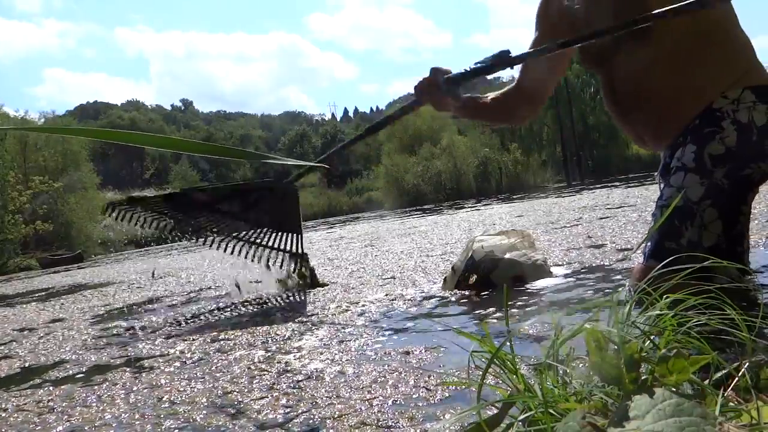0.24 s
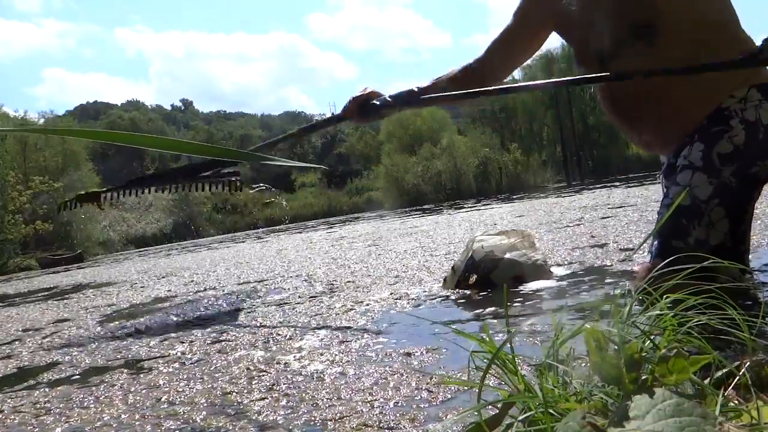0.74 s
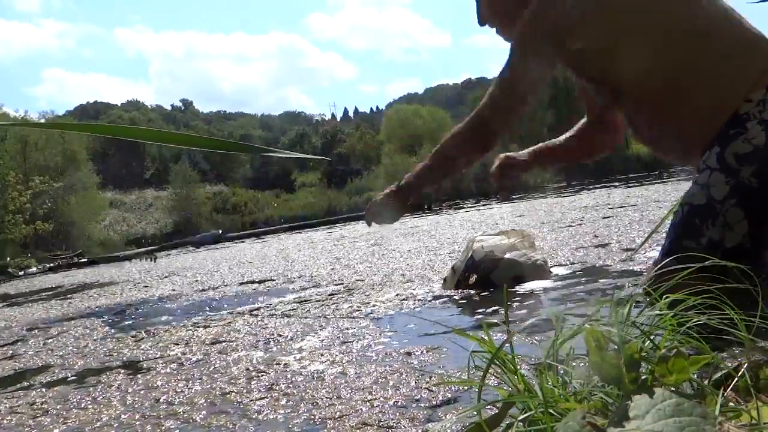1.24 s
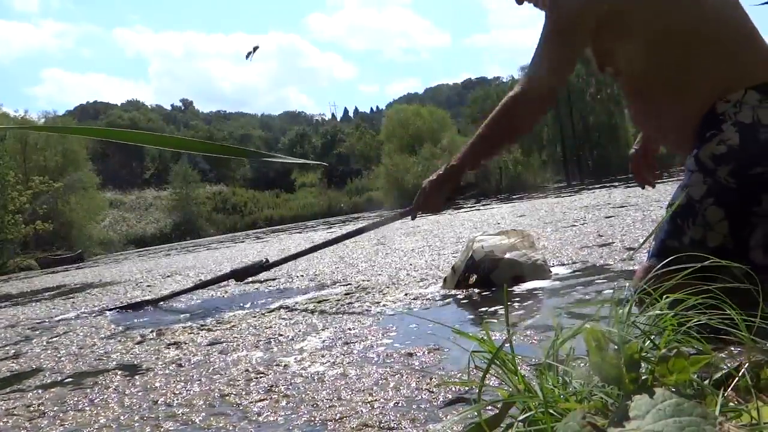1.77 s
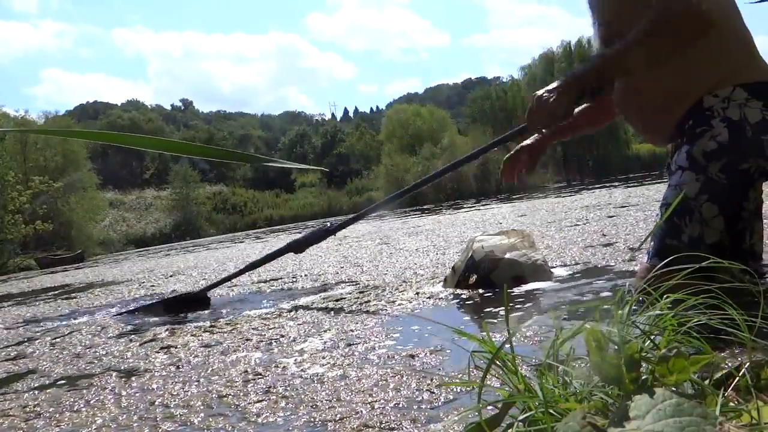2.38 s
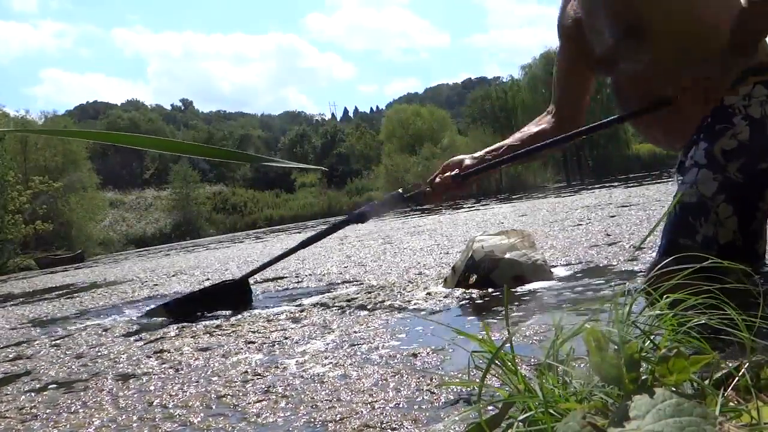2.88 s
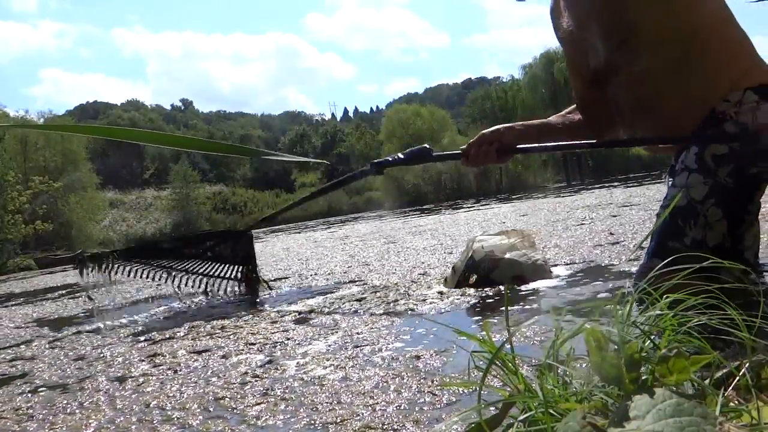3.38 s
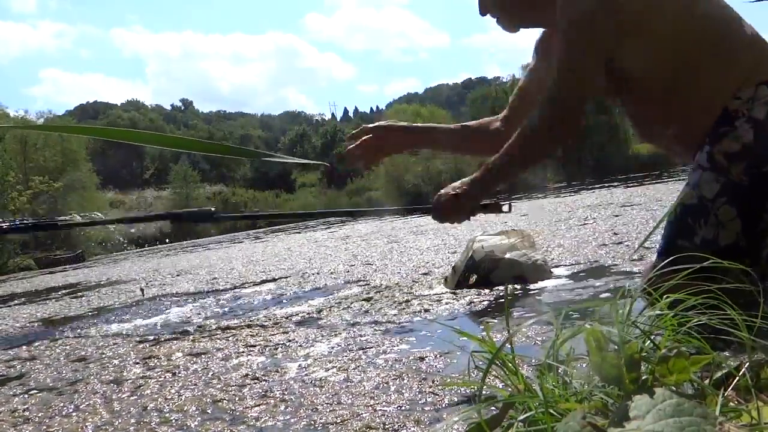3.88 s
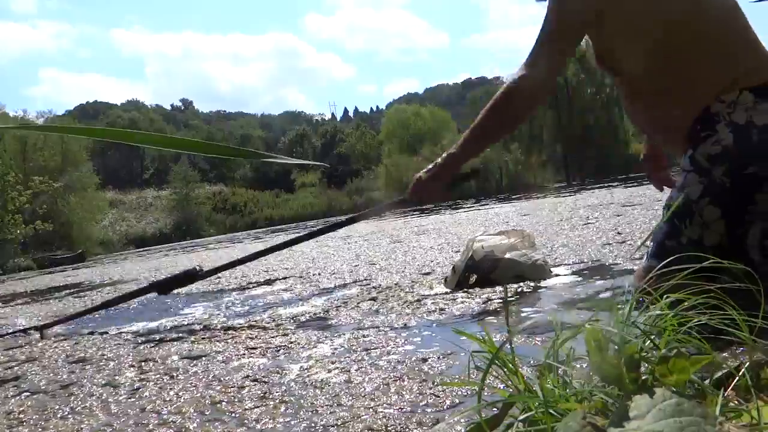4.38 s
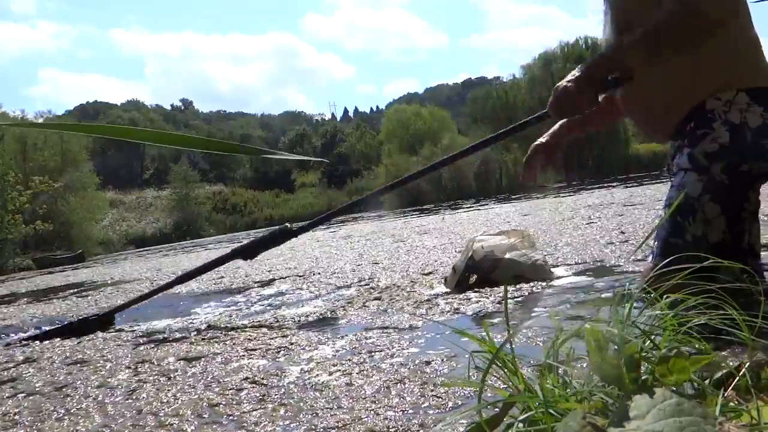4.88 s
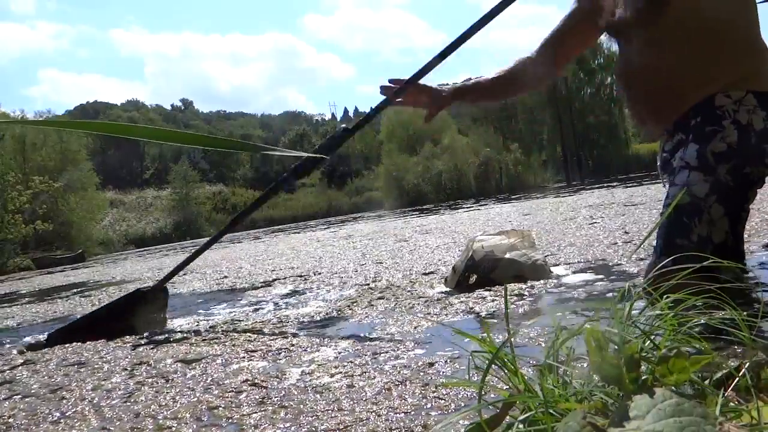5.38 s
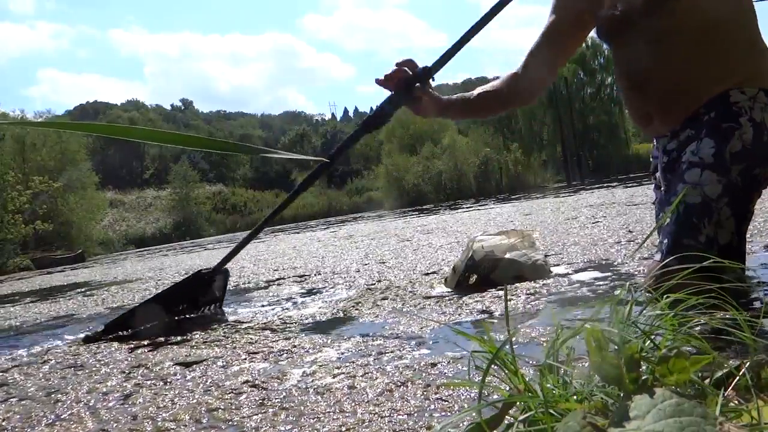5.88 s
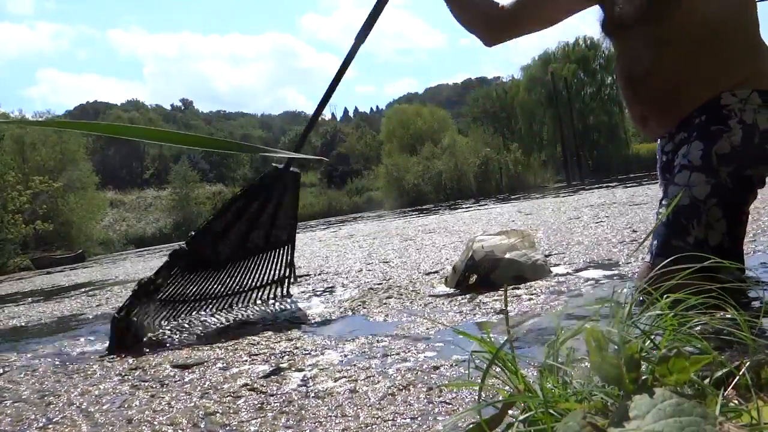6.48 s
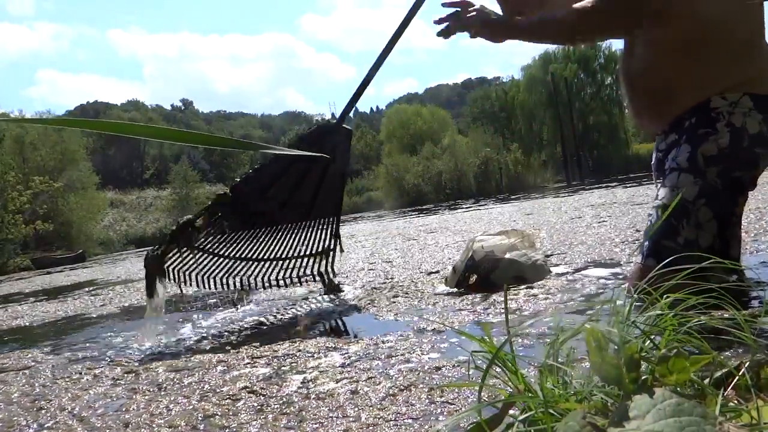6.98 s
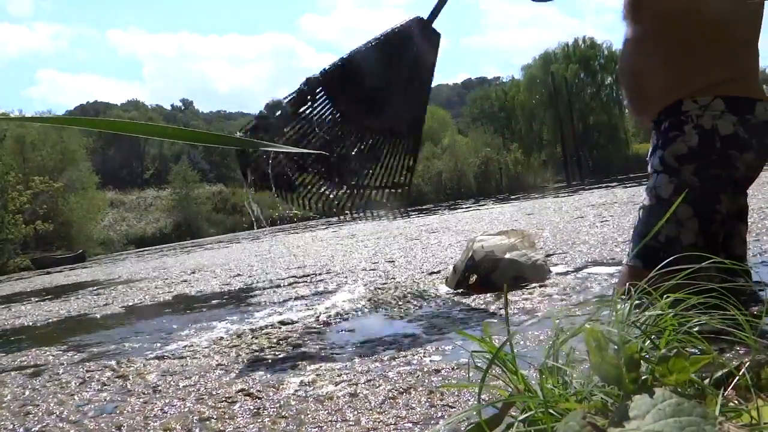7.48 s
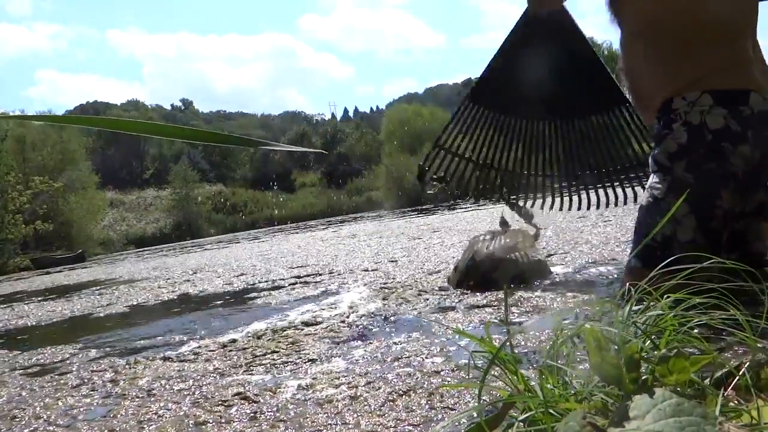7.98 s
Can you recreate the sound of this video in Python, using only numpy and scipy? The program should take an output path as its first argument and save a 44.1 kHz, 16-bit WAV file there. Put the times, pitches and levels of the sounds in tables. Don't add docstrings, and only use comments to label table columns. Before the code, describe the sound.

A shrill cicada chorus, one throbbing close by, fills the outdoor air while a rake drags through a weedy pond with small splashes, drips and trickles.

```python
import sys
import numpy as np
from scipy import signal
from scipy.fft import rfft, irfft, next_fast_len
from scipy.io import wavfile
from scipy.ndimage import uniform_filter1d

SR = 44100
rng = np.random.default_rng(int(sys.argv[2]) if len(sys.argv) > 2 else 0)


def gain_from_db(level_db):
    decades = np.asarray(level_db, float) / 20
    return 10 ** decades


def master(y):
    cut = np.clip(np.atleast_2d(y).T, -1, 1)
    pcm = np.round(cut * 32767)
    wavfile.write(sys.argv[1], SR, pcm.astype(np.int16))


N = 363384


def rms_one(x):
    return x / np.sqrt(np.mean(x ** 2) + 1e-20)


def read(rows, at):
    first, *columns = np.transpose(rows)
    return [np.interp(at, first, c) for c in columns]


def at_hz(points, hz):
    points = np.array(points)
    return np.interp(np.log(hz), np.log(points[:, 0]), points[:, 1])


def drift(rate_hz):
    r = np.exp(-80 * np.pi * rate_hz / SR)
    chance = rng.standard_normal(N // 40 + 2002)
    slow = signal.lfilter([1], [1, -2 * r, r * r], chance)[2000:]
    return np.interp(np.arange(N) / 40, np.arange(len(slow)), rms_one(slow))


def panned(x, left_db):
    return x * gain_from_db(np.array([[left_db / 2], [-left_db / 2]]))


def add(out, x, i):
    x = x[..., :max(N - i, 0)]
    out[..., i:i + x.shape[-1]] += x


def wide_noise(spectrum, patchy_db, count):
    # (frequency [Hz], likeness [0-1])
    likeness = [(60, 0.98), (140, 0.94), (340, 0.86), (810, 0.78), (1930, 0.88), (4590, 0.9), (10900, 0.77)]
    # (frequency [Hz], left minus right [dB])
    leaning = [(60, 2), (140, -0.5), (340, 1), (810, -2), (1930, 2), (4590, 3.5), (10900, 1.5)]
    size = next_fast_len(N)
    hz = np.maximum(np.arange(size // 2 + 1) * SR / size, 1)
    alike = np.clip(at_hz(likeness, hz), 0, 1)
    mid, side = rfft(rng.standard_normal((2, size)))
    pair = np.sqrt(1 + alike) * mid + np.sqrt(1 - alike) * side * [[1], [-1]]
    pair = pair * gain_from_db(at_hz(spectrum, hz) + at_hz(leaning, hz) * [[.5], [-.5]])
    place = np.interp(np.log(hz), np.log([spectrum[0][0], spectrum[-1][0]]), [-1, count])
    out = np.zeros((2, N))
    for k in range(count):
        share = np.clip(1 - np.abs(place - k), 0, 1) ** .5
        out += irfft(pair * share, size)[:, :N] * gain_from_db(patchy_db * drift(13.5))
    return rms_one(out)


def far_chorus(t):
    # (frequency [Hz], density [dB per Hz])
    low_colour = [(1760, -72), (3000, -27), (3310, -22), (3640, -10), (4110, -8), (4440, -6), (4810, -6),
                  (5030, -2.5), (5290, 2), (5430, -6), (5650, -0.5), (6220, -5.5), (7200, -8), (9360, -18),
                  (15800, -120)]
    high_colour = [(5000, -8), (6800, 0.5), (7070, -14), (7560, 8.5), (8570, 1.5), (9300, 0.5),
                   (9700, -0.5), (10500, -4), (11100, 1), (15000, 5)]
    # (time [s], level [dB])
    low_level = [(0, -25), (1.5, -25), (2.5, -24.5), (3, -26), (4.5, -26.5), (5.6, -26.5), (6.4, -26),
                 (6.7, -27.5), (8.24, -27.5)]
    high_level = [(0, -32), (2, -28), (2.5, -38), (3, -32), (4.5, -27), (4.9, -27.5), (5.8, -27.5),
                  (6.4, -31.5), (7.3, -34.5), (7.7, -33), (8.24, -35)]
    low = gain_from_db(read(low_level, t)[0]) * wide_noise(low_colour, patchy_db=0.5, count=5)
    high = gain_from_db(read(high_level, t)[0]) * wide_noise(high_colour, patchy_db=1.43, count=6)
    return low + high


def whining_cicada(t):
    # (time [s], clicks per second [1/s])
    clicks = [(0, 211), (.76, 211.2), (1.23, 211.6), (3.84, 212.5), (4.24, 212.4), (4.57, 211.2),
              (4.73, 209.3), (5.08, 201), (5.5, 191)]
    # (time [s], level [dB])
    effort = [(0, 0), (.8, 2), (1.7, 1), (2.9, .5), (3.5, -1), (4.1, .5), (4.4, 3.5), (4.75, 0), (5.5, 4)]
    # (rms level [dB], time of fullest voice [s], spread [s], time of one top of the bending [s])
    overtones = [(-44.5, 2.02, 1.41, 3.72), (-41.2, 2.35, 1.32, 4.01), (-38.4, 3.64, 1.57, 3.82),
                 (-45.8, 2.89, 1.88, 1.82), (-35.3, 2.78, 1.48, 3.85), (-45.9, 1.86, 2.27, 3.18),
                 (-50.3, 3.79, 3.0, 2.6), (-45.4, 4.02, 1.88, 1.97), (-36.1, 1.87, 1.81, 3.18),
                 (-32.8, 3.12, 0.88, 2.22), (-39.3, 1.93, 1.73, 2.94), (-25.3, 2.97, 0.99, 3.53),
                 (-34.2, 5.4, 3.0, 2.71), (-33.6, 2.72, 1.67, 2.89), (-39.3, 0.02, 3.0, 4.07),
                 (-29.5, 2.47, 1.44, 1.64), (-37.9, 3.18, 1.39, 2.23), (-33.7, 3.01, 1.25, 3.18),
                 (-31.4, 2.97, 1.38, 1.61), (-41.6, 5.5, 3.0, 2.64), (-42.3, 2.29, 2.05, 2.12),
                 (-40.0, 2.72, 1.6, 2.08), (-46.4, 3.3, 3.0, 2.44), (-44.1, 3.45, 1.39, 2.04),
                 (-42.0, 2.93, 1.47, 2.2), (-35.9, 3.14, 0.84, 3.44)]
    first_overtone = 26
    tires_s, end_s = 4.2, clicks[-1][0]
    bend_s, bend_depth = 1.7, .4
    port_phase = .55

    (per_s,), (effort_db,) = read(clicks, t), read(effort, t)
    tired = np.clip((t - tires_s) / (end_s - tires_s), 0, 1)
    unsteady_hz = .045 + .6 * tired ** 2
    turn = 2 * np.pi * np.cumsum(per_s + unsteady_hz * drift(20.0)) / SR
    out, coarse, last = np.zeros((2, N)), t[::64], int(end_s * SR)
    for k, (db, fullest_s, spread_s, top_s) in enumerate(overtones):
        bend = (1 + bend_depth * np.cos(2 * np.pi * (coarse - top_s) / bend_s)) / (1 + bend_depth)
        size = gain_from_db(db) * bend * np.exp(-.5 * ((coarse - fullest_s) / spread_s) ** 2)
        size = np.repeat(size, 64)[:N] * gain_from_db((2.4 + 3 * tired) * drift(6.0))
        start = rng.uniform(0, 2 * np.pi)
        apart = port_phase * rng.choice([-1, 1]) * np.array([[.5], [-.5]])
        out[:, :last] += size[:last] * np.sin((first_overtone + k) * turn[:last] + start + apart)
    ending = np.clip((end_s - t) / 0.29, 0, 1)
    return panned(np.sqrt(2) * gain_from_db(0.24 + effort_db) * ending * out, left_db=1.9)


def drum_pulses(per_s, weak, hz, modes, sharp, ribs):
    count = np.cumsum(per_s) / SR
    every_other = np.floor(count) % 2
    gate = np.abs(np.sin(np.pi * count)) ** (2 * sharp) * (1 - weak * every_other)
    chance = rng.standard_normal((len(modes) + 2, N // 16 + 1)).repeat(16, axis=1)[:, :N]
    uneven, apart, *ragged = signal.lfilter([.1], [1, -.9], chance)
    both = np.zeros(N, complex)
    for (offset_hz, width_hz, db), wander in zip(modes, ragged):
        turn = 2 * np.pi * np.cumsum(hz + offset_hz + width_hz * wander) / SR
        both += gain_from_db(db) * np.exp(1j * turn)
    other = 0.1 * apart * both.imag
    pulses = gate * gain_from_db(ribs * uneven)
    return rms_one(panned(pulses * (both.real + other * [[1], [-1]]), left_db=2.3))


def throbbing_cicada(t):
    # (time [s], level [dB])
    throbs = [(-.17, -31), (.15, -30), (.48, -32), (.78, -30), (1.08, -29), (1.40, -32), (1.70, -28),
              (2.0, -27), (2.31, -25.5), (2.62, -30), (2.94, -32), (3.27, -25.5), (3.58, -25), (3.9, -27.5),
              (4.22, -29.5), (4.55, -27.5), (4.89, -24.5), (5.21, -24), (5.57, -33), (5.85, -28),
              (6.13, -30), (6.41, -29), (6.7, -60), (9, -60)]
    # (share of the throb after the loud end [0-1], pulse rate [1/s], level [dB],
    # weakness of every other pulse [0-1], belly resonance [Hz])
    course = [(0, 161, 2.5, .96, 5560), (.16, 160, 1, .95, 5620), (.3, 160, -4, .9, 5640),
              (.36, 168, -9, .1, 5350), (.6, 178, -6, .05, 5380), (.8, 186, -5, .1, 5460),
              (.88, 162, 0, .92, 5500), (1, 161, 2.5, .96, 5560)]
    # (offset [Hz], width [Hz], level [dB])
    belly_modes = [(-450, 170, -1), (0, 150, 0), (420, 170, -2), (780, 200, -6), (-1000, 300, -11)]
    ends_s, ends_db = np.transpose(throbs)
    place = np.interp(t, ends_s, np.arange(len(throbs)))
    per_s, shape_db, weak, hz = read(course, place - np.floor(place))
    nearest = np.floor(place + .65).astype(int)
    level = uniform_filter1d(gain_from_db(ends_db[nearest] + shape_db + 1), size=300)
    return level * drum_pulses(per_s, weak, hz, belly_modes, sharp=.65, ribs=.5)


def bubble(hz, cycles, rise):
    u = np.arange(int(cycles / hz * SR)) / SR * hz / cycles
    ring = np.sin(2 * np.pi * cycles * (u + rise * u ** 2))
    return ring * np.exp(-5 * u) * (1 - np.exp(-15 * u)) * 2.14


def trickle(per_s, level_db):
    out, chance = np.zeros((2, N)), rng.random((N // 20, 5))
    for j in np.flatnonzero(chance[:, 0] < per_s * 20 / SR):
        hz = 330 * 7 ** (chance[j, 1] ** 1.616)
        size = gain_from_db(-5 * np.log(1 - 0.75 * chance[j, 2])) * (400 / hz) ** 0.06
        ring = bubble(hz, 8 + 12 * chance[j, 3], rise=0.2)
        add(out, panned(size * ring, 5 * (chance[j, 4] - .5)), j * 20)
    return gain_from_db(level_db) * rms_one(out)


def stirred_pond(t):
    # (time [s], level [dB])
    stirring = [(0, -44), (.8, -42), (1.33, -44), (1.58, -42), (2.16, -45.5), (2.84, -43), (4.06, -44.5),
                (4.31, -40.5), (4.8, -42), (5.46, -45), (6.15, -41), (6.68, -43.5), (7.25, -43),
                (7.62, -40.5), (8.24, -43.5)]
    # (frequency [Hz], density [dB per Hz])
    murmur = [(18, -70), (30, -24), (129, -17.5), (332, -2.5), (414, -6.5), (559, 2), (904, -8), (1080, -4),
              (1400, -4), (1580, -8), (2180, -9), (3190, -7), (3600, -7), (4680, -8), (7920, -120)]
    stir_db, = read(stirring, t)
    bubbles = trickle(155, -55 + 0.9 * (stir_db - stir_db.mean()))
    return gain_from_db(stir_db) * wide_noise(murmur, patchy_db=1.48, count=6) + bubbles


def splashes():
    # (time [s], bubble peak [dB], bubble pitch [Hz], spray peak [dB], spray length [s])
    slaps = [(1.379, -31, 540, -22.5, 0.011), (1.396, -19.5, 460, -23.5, 0.0043),
             (4.082, -33, 565, -37.5, .005), (4.097, -48, 600, -26.5, 0.028),
             (4.114, -23, 520, -36, 0.0075), (4.15, -36, 605, -28.5, 0.027),
             (4.167, -18.5, 393, -20.5, 0.0024), (7.634, -23, 1054, -28, 0.0055),
             (7.652, -42, 333, -33, .008), (8.075, -29, 625, -28, .004), (8.106, -36, 546, -32.5, 0.008),
             (8.195, -25, 627, -28.5, .004)]
    # (time [s], peak [dB], bubble pitch [Hz])
    drips = [(.009, -44, 382), (.607, -28, 1020), (.799, -25, 452), (1.029, -45, 1020), (1.658, -38, 325),
             (2.519, -28, 500), (2.859, -30, 563), (2.916, -32, 380), (2.944, -28, 440), (2.976, -18, 484),
             (3.059, -31, 360), (3.134, -24.5, 580), (4.247, -37, 440), (4.53, -21, 643),
             (6.699, -26.5, 589), (6.812, -31, 338), (6.839, -25, 293), (6.885, -32, 295),
             (6.927, -28, 300), (7.042, -24.5, 396), (7.729, -29, 432)]
    # (time [s], peak [dB])
    thumps = [(.009, -51), (1.395, -49), (2.961, -42), (2.976, -34), (3.06, -49), (4.168, -54),
              (6.813, -43), (6.839, -46), (7.635, -56)]
    # (frequency [Hz], density [dB per Hz])
    spray_colour = [(60, -22), (250, -9.5), (600, -1), (1000, -13), (1500, -7.5), (3000, -3.5),
                    (5000, -5.5), (9000, -2), (20000, -17)]
    out, spray = np.zeros((2, N)), wide_noise(spray_colour, patchy_db=-2, count=2)
    droplets = signal.sosfilt(signal.butter(2, 250, fs=SR, output="sos"), rng.standard_normal(N))
    spray = rms_one(spray * gain_from_db(1.7 * rms_one(droplets)))
    for s, db, hz, spray_db, length_s in slaps:
        i, u = round(s * SR), np.arange(6000) / SR / max(length_s, .002)
        swell = u ** 1.63 * np.exp(-u ** 1.43)
        burst = swell[:N - i] * spray[:, i:i + 6000]
        add(out, gain_from_db(spray_db + 11.5) * burst / np.abs(burst).max(), i)
        add(out, gain_from_db(db + 0.5) * bubble(hz, 6.1, rise=0.065), i)
    for s, db, hz in drips:
        add(out, gain_from_db(db - 11.0) * bubble(hz, 17.0 + hz / 150, rise=0.054), round(s * SR))
    for s, db in thumps:
        add(out, gain_from_db(db + 2.5) * bubble(177, 5.6, rise=0.099), round(s * SR))
    return out


def ticks():
    # (time [s], peak [dB], pitch [Hz])
    drops = [
        (0.38, -33, 2020),
        (0.698, -32, 1820),
        (1.179, -25, 2360),
        (2.321, -30, 2230),
        (4.196, -22, 1900),
        (8.099, -28, 2340),
    ]
    out = np.zeros((2, N))
    for s, db, hz in drops:
        for ratio in (.8, 1.02, 1.3):
            tick = gain_from_db(db - 4.5) * bubble(hz * ratio, 24.0, rise=.03)
            add(out, panned(tick, -3.5), round(s * SR))
    return out


def brief_singers(t):
    # (time [s], length [s], first pitch [Hz], last pitch [Hz], level [dB])
    phrases = [
        (3.299, .5, 5050, 5080, -32.5),
        (4.302, 0.43, 5180, 5150, -34),
        (4.944, 0.27, 5830, 6250, -30),
        (5.472, 0.39, 5540, 5900, -29),
        (5.88, .35, 5620, 5720, -33),
        (.45, .4, 4930, 4970, -38),
        (1.4, .35, 4920, 5030, -31),
        (1.8, .75, 5500, 5640, -34),
    ]
    level, hz = np.zeros(N), np.full(N, 5500.)
    for s, length_s, first_hz, last_hz, db in phrases:
        share = (t - s) / length_s
        on = (share > 0) & (share < 1)
        level[on] = gain_from_db(db) * np.sin(np.pi * share[on]) ** 0.29
        hz[on] = first_hz + (last_hz - first_hz) * share[on]
    return level * drum_pulses(np.full(N, 170.), 0.11, hz, [(0.0026, 129, 0)], sharp=0.46, ribs=1.5)


def gurgles():
    # (time [s], length [s], peak [dB], highest bubble pitch [Hz])
    bunches = [
        (2.946, .065, -40, 650),
        (4.106, .1, -46, 790),
        (6.809, .15, -41, 478),
        (7.623, .03, -28.5, 1780),
    ]
    low_hz = 265
    out = np.zeros((2, N))
    for (s, length_s, db, top_hz), chance in zip(bunches, rng.random((len(bunches), 20, 3))):
        for late, high, size in chance:
            hz = low_hz * (top_hz / low_hz) ** high
            add(out, gain_from_db(db - 6.3 * size) * bubble(hz, 11.0, rise=.08), round((s + late * length_s) * SR))
    return out


def held_rattle(t):
    # (time [s], level [dB])
    rattle = [(6.2, -45), (6.32, -24), (6.8, -29), (7.05, -33.5), (7.25, -25.5), (7.45, -24), (7.6, -27.5),
              (7.9, -28.5), (8.24, -33.5)]
    # (offset [Hz], width [Hz], level [dB])
    slack_modes = [(-480, 170, -8), (0, 145, 0), (640, 200, -7), (1050, 200, -11), (-1080, 140, -12)]
    first_hz, settled_hz, settle_s = 5740, 5440, 1.2
    since = np.maximum(t - rattle[0][0], 0)
    per_s = 158 - 3 * np.maximum(t - 7.25, 0)
    hz = settled_hz + (first_hz - settled_hz) * np.exp(-since / settle_s)
    start = np.clip(since / 0.086, 0, 1)
    return start * gain_from_db(read(rattle, t)[0]) * drum_pulses(per_s, .25, hz, slack_modes, sharp=1.2, ribs=.8)


def late_singer(t):
    # (time [s], level [dB])
    entry = [(7.9, -64), (8.0, -41), (8.24, -40)]
    buzz = drum_pulses(np.full(N, 45.), .1, np.full(N, 10600.), [(0.017, 314, 0)], sharp=.4, ribs=2.7)
    return gain_from_db(read(entry, t)[0]) * buzz


def scene():
    t = np.arange(N) / SR
    cicadas = far_chorus(t) + whining_cicada(t) + throbbing_cicada(t)
    cicadas += brief_singers(t) + held_rattle(t) + late_singer(t)
    water = stirred_pond(t) + splashes() + ticks() + gurgles()
    return cicadas + water


def top_cut(x):
    return signal.sosfilt(signal.butter(12, 11540, fs=SR, output="sos"), x)


def record(dry):
    thin = signal.sosfilt(signal.butter(2, 110, "high", fs=SR, output="sos"), dry)
    mix = signal.sosfilt(signal.ellip(14, .5, 90, 10980, fs=SR, output="sos"), thin)
    return top_cut(mix)


dry = scene()
out = record(dry)
master(out)
```